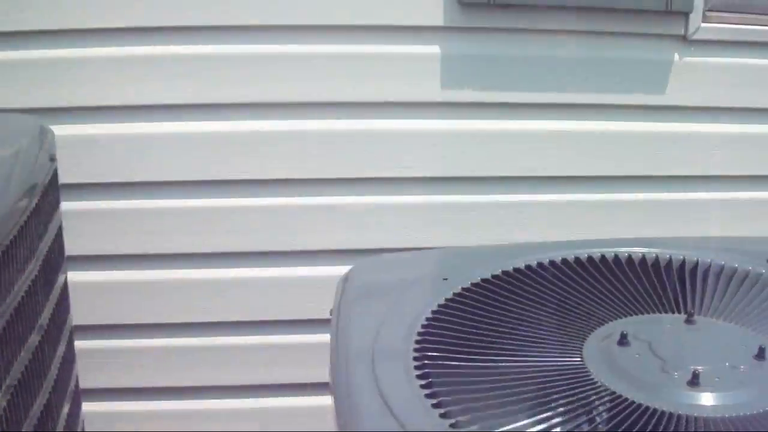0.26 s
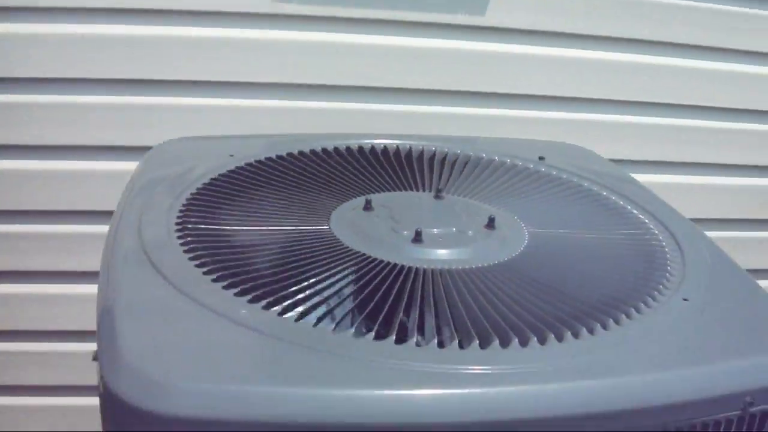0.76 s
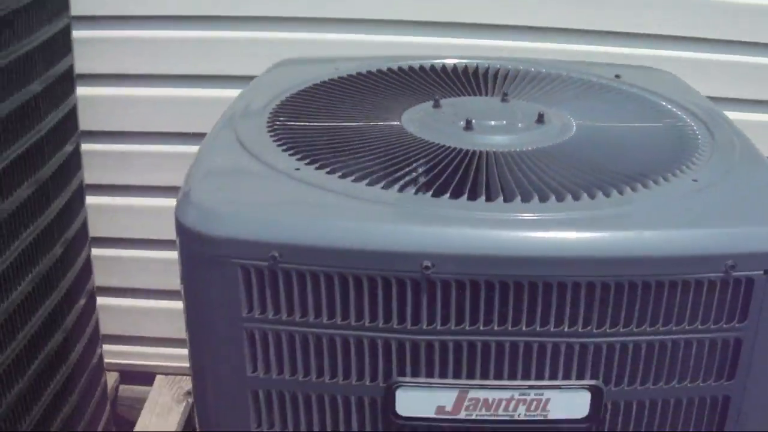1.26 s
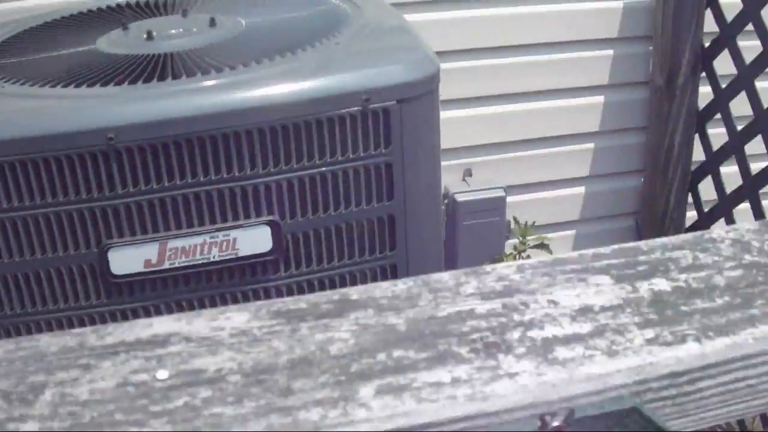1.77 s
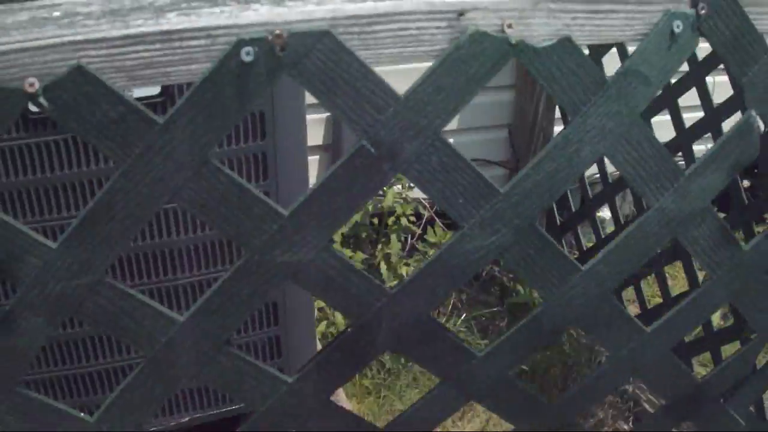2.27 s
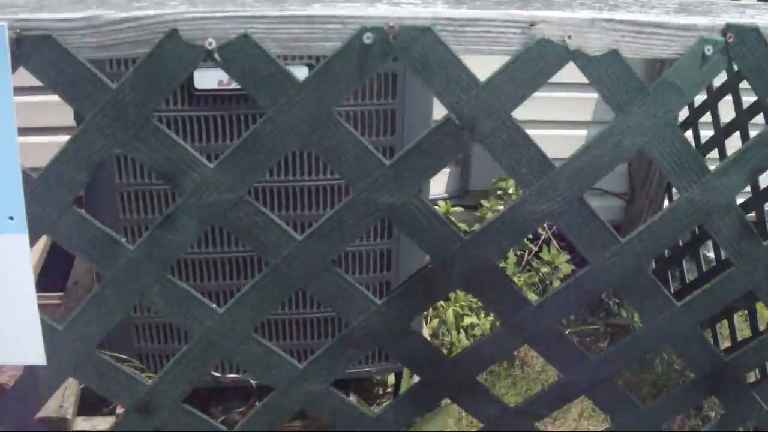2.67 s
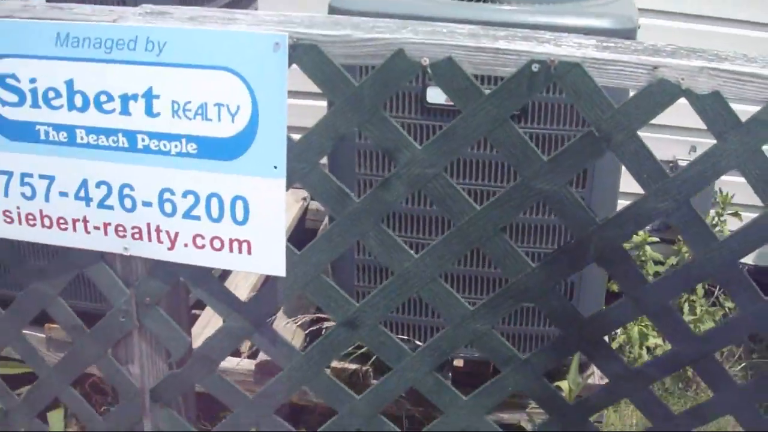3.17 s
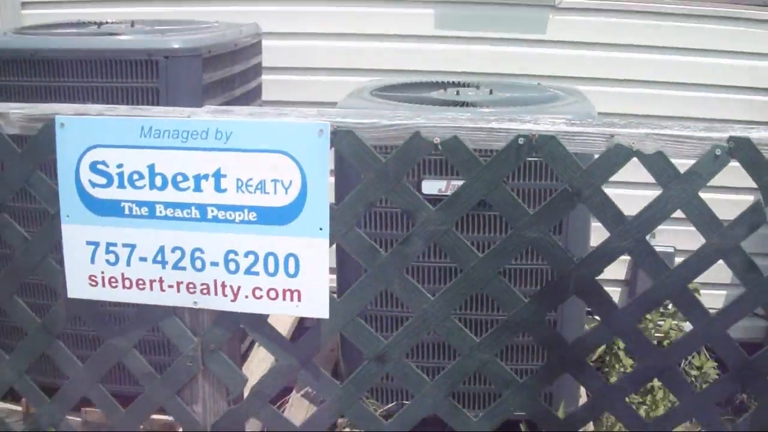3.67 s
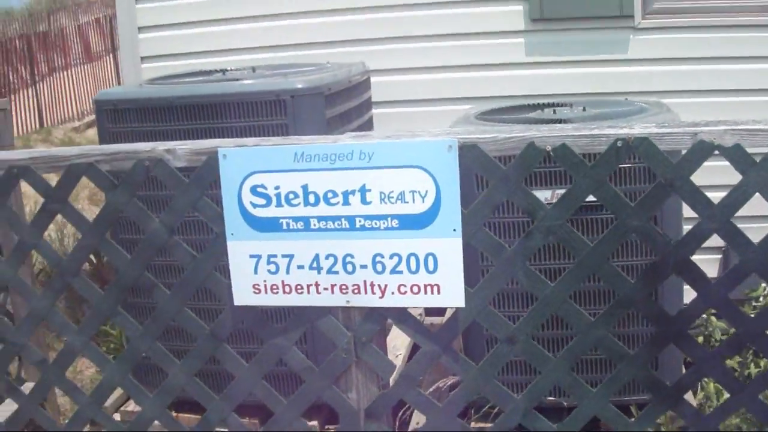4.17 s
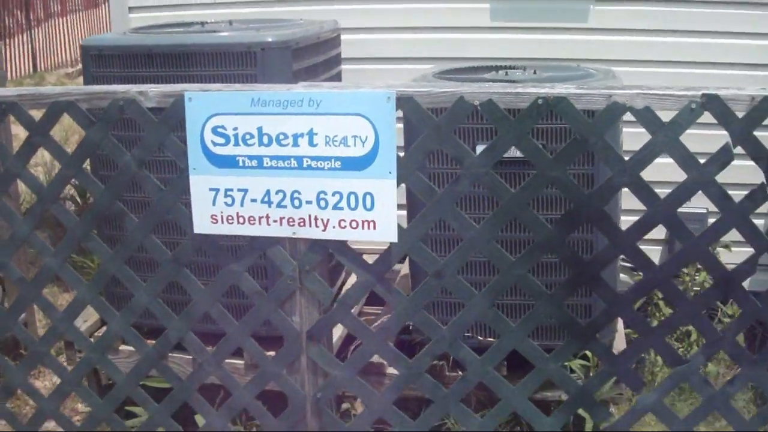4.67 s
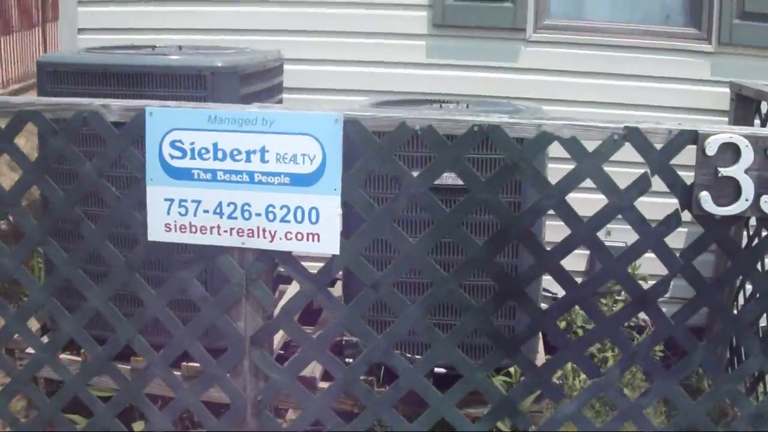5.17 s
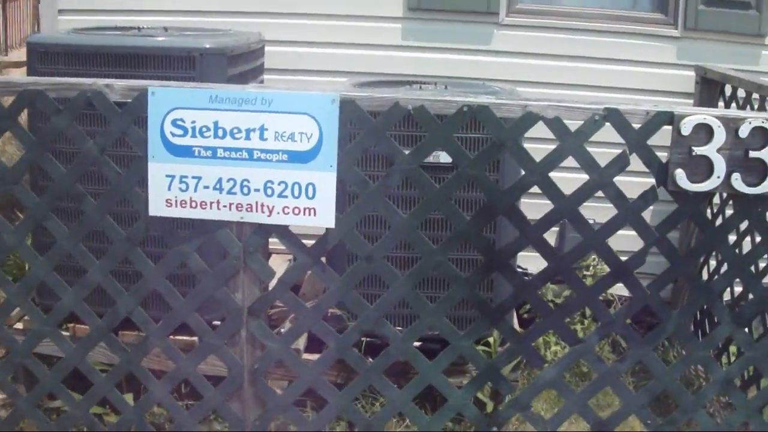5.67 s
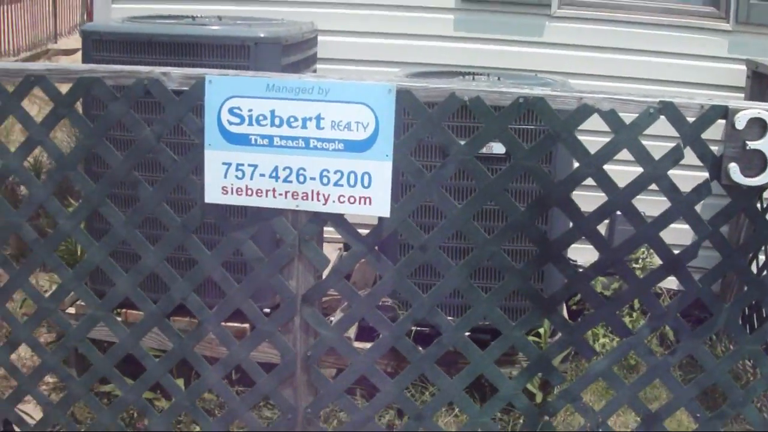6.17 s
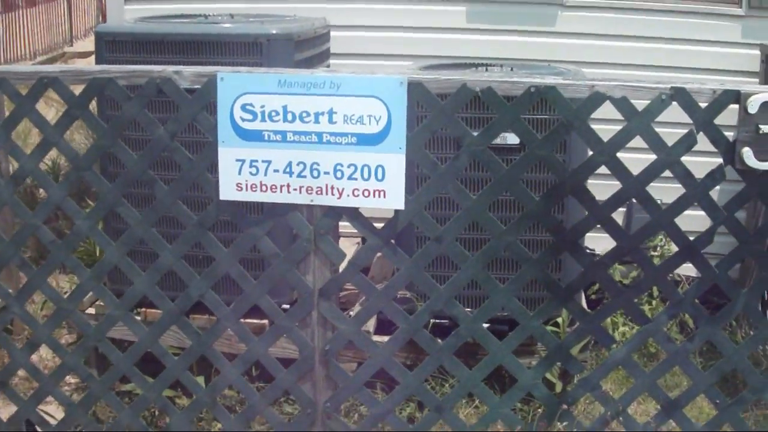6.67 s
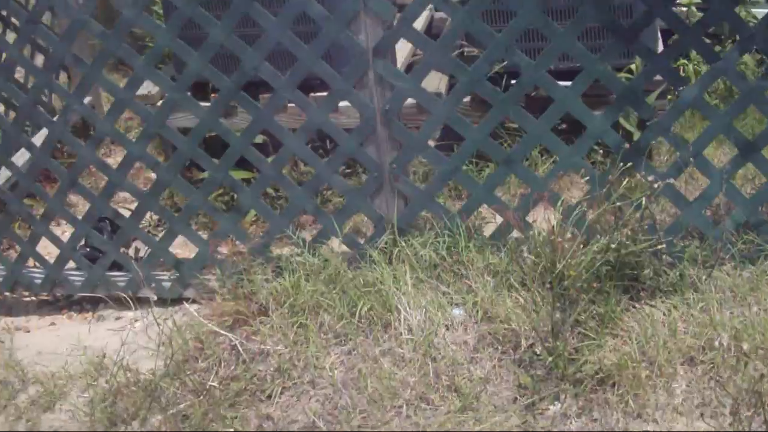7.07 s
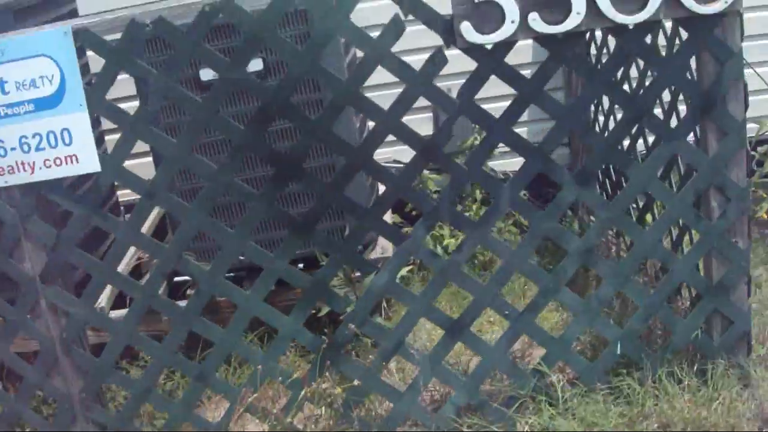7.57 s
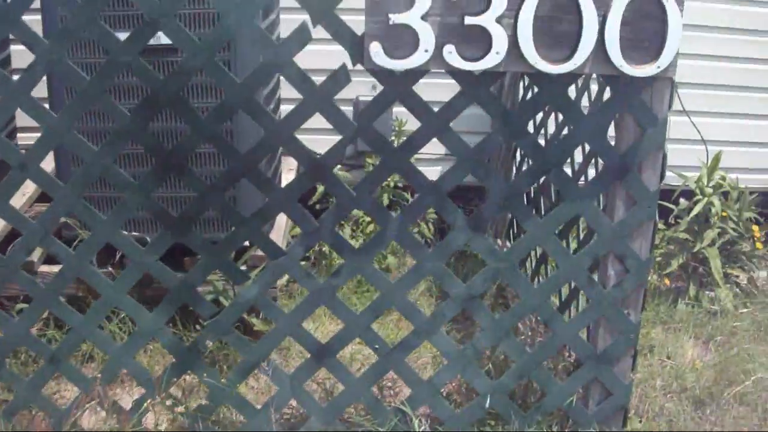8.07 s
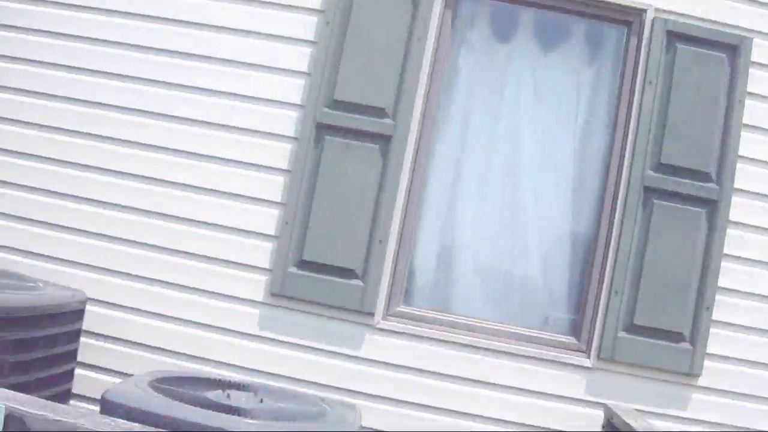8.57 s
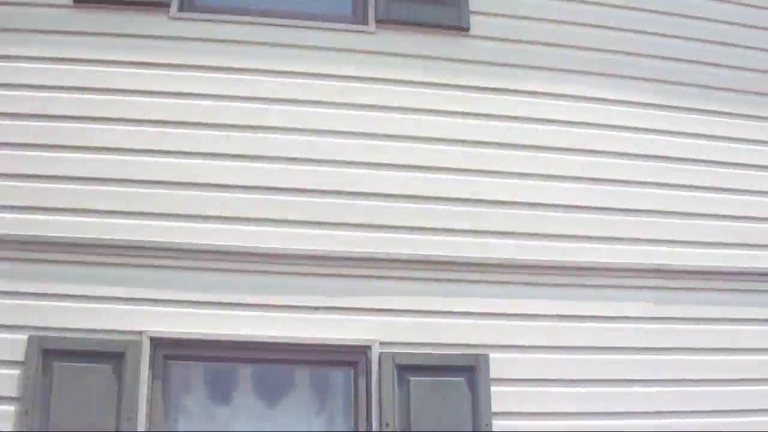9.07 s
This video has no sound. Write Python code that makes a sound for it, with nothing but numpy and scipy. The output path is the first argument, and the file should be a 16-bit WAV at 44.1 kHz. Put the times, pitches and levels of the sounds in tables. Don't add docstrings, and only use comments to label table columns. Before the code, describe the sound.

Outdoors beside a house wall, two heat pump units hum with low compressor tones and a broad fan rush. A hand-held microphone starts close and backs away, so the units soften. Midway come soft thuds, two sharp twig snaps and wind rumble; a far engine drones higher, cars wash past, and small metal ticks and faint bird chirps come late.

```python
import sys
import numpy as np
from scipy import signal
from scipy.fft import rfft, irfft, next_fast_len
from scipy.io import wavfile
from scipy.ndimage import uniform_filter1d

SR = 44100
rng = np.random.default_rng(int(sys.argv[2]) if len(sys.argv) > 2 else 0)


def makeup_ratio(level_db):
    decades = np.asarray(level_db, float) / 20
    return 10 ** decades


def file_out(sig):
    cols = np.atleast_2d(sig).T
    lim = np.clip(cols, -1, 1)
    pcm = np.round(lim * 32767).astype(np.int16)
    wavfile.write(sys.argv[1], SR, pcm)


N = 410571
T = np.arange(N) / SR


def curves(table):
    s, *columns = np.transpose(table)
    return [np.interp(T, s, c) for c in columns]


def walk(rate):
    k = int(SR / rate)
    held = np.repeat(rng.standard_normal(N // k + 1), k)
    return 1.55 * uniform_filter1d(uniform_filter1d(held, k), k)[:N]


def tone(hz, db, wobble_db=0., rate=6.):
    turns = np.cumsum(hz / SR + 0 * T) + rng.random()
    return np.sqrt(2) * makeup_ratio(db + wobble_db * walk(rate)) * np.sin(2 * np.pi * turns)


def share(spectrum, hz, lo_hz, hi_hz):
    f, db = np.transpose(spectrum)

    def density(at_hz):
        return makeup_ratio(2 * np.interp(np.log(at_hz), np.log(f), db))

    return density(hz) / np.sum(density(np.arange(lo_hz, hi_hz)))


def swells(base_db, events):
    return makeup_ratio(2 * base_db) + sum(makeup_ratio(2 * db) * np.exp(-((T - s) / half) ** 2) for s, db, half in events)


def add(x, s, sound):
    i = int(s * SR)
    x[i:i + len(sound)] += sound[:N - i]


def ring(hz, t60, rise=0.00025, sag=0.):
    t = T[:int(.3 * SR)]
    bent = t + sag * 0.00069 * (1 - np.exp(-t / 0.00067))
    return np.sin(2 * np.pi * hz * bent) * 1000. ** (-t / t60) * (1 - np.exp(-t / rise))


def distance_m():
    # start_s, distance_m
    path = [(0, 1.01), (.6, 1.14), (1.2, 1.37), (1.9, 1.92), (2.5, 2.6), (3.3, 2.9), (4.2, 3.6), (5.3, 4.4),
            (7.1, 5.2), (9.31, 5.1)]
    return curves(path)[0]


def heard_db(db_at_1m, loss, fence_db, turn_db):
    behind_fence = (1 + np.tanh((T - 2.78) / 0.18)) / 2
    facing_wall = (1 + np.tanh((T - 7.3) / 0.27)) / 2
    return db_at_1m - loss * 20 * np.log10(distance_m()) + fence_db * behind_fence + turn_db * facing_wall


def fan_db():
    return heard_db(-40.5, 0.71, fence_db=-7, turn_db=2.5)


def near_compressor():
    # order, start_level_db
    orders = [(1, -43), (5, -52), (6, -51.5), (7, -51.5), (13, -58), (14, -57), (15, -69), (17, -56),
              (18, -66), (19, -54), (20, -58.5), (21, -60.5), (22, -56.5), (23, -68), (25, -93),
              (30, -67.5), (32, -71), (36, -64.5), (39, -65), (43, -81), (78, -70)]
    shaft_hz = 58.88
    out = tone(3 * shaft_hz, heard_db(-33, 0.62, fence_db=-0.7, turn_db=-3.5), 1.46, 9.5)
    fade_db = 0.83 * (fan_db() - fan_db()[SR])
    return out + sum(tone(round(k) * shaft_hz, db + fade_db, 1.55, 2.55) for k, db in orders)


def far_compressor():
    # order, level_db
    orders = [(1, -47), (10, -65.5), (17, -81), (18, -60.5), (19, -75), (20, -81), (21, -80), (23, -69),
              (25, -71), (26, -75.5)]
    shaft_hz, far_db = 58.97, heard_db(-0.5, 0.24, fence_db=2.5, turn_db=2)
    return sum(tone(round(k) * shaft_hz, db + far_db, 2.1, 2.52) for k, db in orders)


def mains_buzz():
    # order, level_db
    orders = [(2, -53), (6, -60.5), (8, -69)]
    mains_hz = 59.95
    out = tone(4 * mains_hz, heard_db(-36, 0.64, fence_db=0.93, turn_db=3), 1.03, 5.5)
    return out + sum(tone(round(k) * mains_hz, db, 1.1, 2.57) for k, db in orders)


def fan_blades():
    blade_hz = 42.8
    blade_db = heard_db(-34.5, 1.16, fence_db=1.5, turn_db=1) + 2.0 * walk(4.5)
    return tone(blade_hz, blade_db - 2.0, 1.7) + tone(2 * blade_hz, blade_db - 11.5, 2.8)


def fan_rush():
    # pitch_hz, density_db (per Hz)
    colour = [(40, -18), (100, -5.5), (160, -9), (280, -14), (400, -18), (500, -13), (640, -14.5),
              (1000, -21), (1300, -30), (1600, -41.5), (2600, -52), (4000, -90)]
    level = makeup_ratio(2 * fan_db())
    return lambda hz: level * share(colour, hz, 375, 602)


def grille_hiss():
    # pitch_hz, density_db (per Hz)
    colour = [(760, -14), (1300, -2), (1600, -7.5), (2100, -4), (2500, -9), (3000, -10.5), (3480, -18.5),
              (3950, -10.5), (4500, -10.5), (5000, -20.5), (6800, -13.5), (7800, -20), (9000, -23),
              (11700, -49), (19800, -120)]
    level = makeup_ratio(2 * heard_db(-47, 0.98, fence_db=-0.26, turn_db=3.5))
    return lambda hz: level * share(colour, hz, 1870, 4650)


def wall_gap():
    level = makeup_ratio(2 * heard_db(-50, 0.32, fence_db=2.5, turn_db=-2)) * makeup_ratio(2.2 * walk(4.5)) / 200
    centre = np.log2((660 + 25 * distance_m()) * (1 + .03 * walk(2.5)))  # Hz, plus Hz per metre
    return lambda hz: level * np.maximum(1 - ((np.log2(hz) - centre) / 0.48) ** 2, 0) ** 2


def wind():
    # pitch_hz, density_db (per Hz)
    colour = [(15, -6.5), (30, -2.5), (50, -6), (80, -6), (130, -9), (220, -15), (400, -46), (800, -90)]
    # start_s (the peak), peak_db, half_length_s
    gusts = [(0, -50, .3), (1.8, -43, 0.35), (2.599, -40, 0.14), (3.3, -39.5, .4), (3.8, -42.5, .3),
             (4.55, -45, 0.18), (5.1, -43, .35), (5.8, -46, 0.37), (7.05, -47, .3), (8.1, -51, 0.73)]
    level = swells(-54, gusts) * makeup_ratio(4.7 * walk(11))
    return lambda hz: level * share(colour, hz, 18.3, 37.0)


def road():
    # pitch_hz, density_db (per Hz)
    colour = [(100, -62), (260, 2.5), (450, 6), (650, -65), (1050, 1.5), (1400, -17), (2500, -22),
              (4000, -45), (8000, -80)]
    # start_s (the peak), peak_db, half_length_s
    cars = [(.9, -60, 1.2), (3.0, -49.5, 0.11), (3.55, -48, 0.58), (4.7, -52.5, .2), (8.1, -51, 0.69),
            (8.75, -47.5, .25), (9.25, -50, .2)]
    level = swells(-59.5, cars)
    return lambda hz: level * share(colour, hz, 200, 1500)


def yard():
    # pitch_hz, density_db (per Hz)
    colour = [(120, -4), (200, -9), (249, -3.5), (288, -2), (497, -21.5), (743, -12), (1780, -25.5),
              (2180, -25.5), (5820, -28), (6730, -41), (7370, -23), (7930, -28), (13900, -28), (14700, -21),
              (15600, -40)]
    level = makeup_ratio(2 * (-44.5 - 3.5))
    return lambda hz: level * share(colour, min(hz, 13900), 257, 16500)


def air():
    moving = [fan_rush(), grille_hiss(), wall_gap(), wind(), road()]
    steady = yard()
    size = next_fast_len(N)
    octave = np.log2(np.arange(1, size // 2 + 2) * SR / size)
    white, out = rfft(rng.standard_normal(size)) * np.sqrt(SR / 2), np.zeros(N)
    for hz in 16 * 2 ** (np.arange(61) / 6):
        slope = np.clip(6 * (octave - np.log2(hz)), -1, 1)
        band = irfft(white * np.cos(np.pi / 2 * slope) ** 2, size)[:N]
        power = sum(source(hz) for source in moving)
        flicker = makeup_ratio(2.0 * (hz / 500) ** -.25 * walk(4.6))
        out += band * np.sqrt(power * flicker + steady(hz))
    return out


def step_bumps():
    # start_s, peak_db, pitch_hz, t60_s
    bumps = [(2.401, -20, 45, 0.097), (2.56, -16, 70, 0.076), (2.995, -13, 55, 0.087), (3.14, -19, 45, .08),
             (3.25, -19, 28, .12), (3.36, -14, 35, .09), (3.74, -20, 60.2, .08), (4.566, -13.5, 62, .09),
             (4.85, -14, 132, 0.068), (4.85, -16, 45, .07), (7.497, -15.5, 45.3, 0.1)]
    out = np.zeros(N)
    for s, db, hz, t60 in bumps:
        add(out, s, makeup_ratio(db) * (ring(hz, t60, 0.0051) + 0.34 * ring(1.58 * hz, 0.7 * t60, 0.0058)))
    return out


def dry_snap(lo_hz, hi_hz, hi_db, t60):
    wood = ring(lo_hz, t60, sag=0.93 * (1050 / lo_hz) ** 2)
    for gain, ratio, length in [(0.42, 1.9, 1), (0.35, 0.61, 1.85), (0.12, 0.406, 4)]:
        wood = wood + gain * ring(ratio * lo_hz, length * t60)
    fibre = ring(hi_hz, t60)
    for gain, ratio, length in [(0.48, 1.08, 0.65), (0.34, .61, 1.06), (0.66, 1.17, 1),
                                (.5, 0.876, 0.88), (0.12, 1.3, 1)]:
        fibre = fibre + gain * ring(ratio * hi_hz, length * t60)
    return wood + makeup_ratio(hi_db) * fibre


def twigs_and_grass():
    # start_s, peak_db, low_ring_hz, high_ring_hz, high_ring_db
    snaps = [
        (3.0166, -11.5, 1080, 2400, -11),
        (3.0157, -29, 3840, 9000, -7),
        (4.1731, -27.5, 2040, 2300, -1),
        (4.1743, -14.5, 2470, 6350, 1.5),
        (3.6, -40.5, 3000, 7000, 6),
    ]
    # start_s, peak_db, high_ring_hz, t60_s
    cracks = [(.864, -49.5, 7540, 0.022), (3.0072, -42, 7400, .014), (7.5, -56, 6600, .04),
              (7.517, -55, 6100, .025), (8.066, -53, 7500, .03), (8.87, -55, 7700, .03)]
    breaks = [(*row, .0078) for row in snaps]
    breaks += [(s, db, 4640, hz, 10.5, t60) for s, db, hz, t60 in cracks]
    out = np.zeros(N)
    for s, db, lo_hz, hi_hz, hi_db, t60 in breaks:
        rattle = 0.19 * rng.standard_normal(900) * np.exp(-T[:900] / 0.0018)
        add(out, s, makeup_ratio(db) * dry_snap(lo_hz, hi_hz, hi_db, t60))
        add(out, s, makeup_ratio(db) * uniform_filter1d(rattle, size=2))
    return out


def strap_ring():
    # start_s, peak_db
    ticks = [(4.8184, -46), (7.4864, -47), (7.4994, -40.5), (7.5163, -38), (7.5727, -44), (8.0646, -38.5),
             (8.8662, -39), (8.8774, -43), (9.0488, -34.5)]
    # pitch_hz, level_db, t60_s
    modes = [(6660, -14, 0.034), (7600, -10, 0.02), (8900, -10, .025), (9690, -4, 0.054),
             (10300, -1, 0.039), (11600, -4.5, .025), (13600, -10, .02)]
    out = np.zeros(N)
    for s, db in ticks:
        for hz, mode_db, t60 in modes:
            strike_db, detune = 2.1 * rng.standard_normal(), 1 + .012 * rng.standard_normal()
            add(out, s, makeup_ratio(db - 3.5 + mode_db + strike_db) * ring(hz * detune, t60, .0005))
    return out


def chopper_whine():
    out = tone(7170.2, -56.5) * np.tanh(16.0 * np.sin(np.pi * 54.37 * T))
    for hz, q, db in [(7100, 21, -58.0), (6400, 12, -51.0)]:
        out = out + makeup_ratio(db) * signal.lfilter(*signal.iirpeak(hz, q, SR), rng.standard_normal(N))
    return out


def sensor_whine():
    # start_s, phase_slip_turns (per frame)
    slip = [(0.0, 0.1), (0.42, 1.28), (1.6, 1.3), (1.85, 0.79), (2.22, 0.94), (2.85, -1.95), (3.05, -2.18),
            (3.5, -1.8), (4.0, -0.71), (4.4, -0.06), (4.7, 0.21), (5.85, 0.26), (7.0, -0.15), (7.4, -0.8),
            (7.62, -0.96), (8.25, -2.88), (8.43, -2.96), (9.31, 1.25)]
    # start_s, end_s
    spells = [(0, 0.28), (.95, 1.25), (2, 2.4), (2.92, 3.22), (5.9, 6.25), (7.1, 7.25), (7.65, 8.25),
              (9.05, 9.31)]
    frame = (T * 29.65).astype(int)
    turns = 14884 * T + np.cumsum(curves(slip)[0] * np.diff(frame, prepend=0))
    spell = uniform_filter1d(sum((T > a) * (T < b) * 1. for a, b in spells), size=800)
    half_pitch = makeup_ratio(-68.5 + 9 * spell) * np.sin(np.pi * turns)
    return makeup_ratio(-56.5) * np.sin(2 * np.pi * turns) + half_pitch


def engine():
    # start_s, firing_hz, level_db
    throttle = [(.8, 91.97, -43), (1.3, 93, -40), (1.92, 97.7, -39), (2.3, 103, -45.5), (2.72, 107.4, -29),
                (3.68, 114.0, -27), (4.41, 116.1, -30.5), (4.75, 117, -36), (5.55, 122.5, -28),
                (5.74, 119.2, -38), (6.43, 122.5, -28.5), (6.68, 122.0, -40.5), (7.0, 119.3, -32.5),
                (7.35, 111.7, -41), (7.66, 104.3, -43), (8.3, 103, -54), (8.75, 107.2, -47),
                (9.24, 110.5, -39.5)]
    hz, db = uniform_filter1d(curves(throttle), size=4000)
    main = tone(hz, db, 1.02, 14) + tone(hz * 2 / 3, db - 18, 3.6)
    main_fade = np.clip((T - .8) / .15, 0, 1)
    pull_fade = np.clip(np.minimum(T - 0.77, 2.7 - T) / 0.14, 0, 1)
    return main_fade * main + pull_fade * tone(1.4 * hz, -40.5, 2.5, 8.4)


def bird():
    # start_s, length_s, start_hz, end_hz, level_db
    chirps = [
        (7.705, .05, 2805, 2730, -61),
        (7.765, .045, 2150, 2080, -61),
        (7.805, .035, 2130, 2220, -59),
        (7.86, .04, 2750, 2790, -62),
        (8, .035, 2200, 2150, -61),
        (8.025, .04, 2250, 2500, -63),
    ]
    out = np.zeros(N)
    for s, length, start_hz, end_hz, db in chirps:
        n = int(length * SR)
        turns = np.cumsum(np.linspace(start_hz, end_hz, n)) / SR
        add(out, s, 2 * makeup_ratio(db) * np.hanning(n) ** .5 * np.sin(2 * np.pi * turns))
    return out


def scene():
    units = near_compressor() + far_compressor() + mains_buzz() + fan_blades()
    handling = step_bumps() + twigs_and_grass() + strap_ring()
    electronics = chopper_whine() + sensor_whine()
    return np.tile(units + air() + handling + electronics + engine() + bird(), (2, 1))


def roll_off(x):
    return signal.sosfilt(signal.butter(12, 15710, fs=SR, output="sos"), x)


def record(dry):
    cut = signal.sosfilt(signal.ellip(10, .2, 60, 15750, fs=SR, output="sos"), dry)
    left, right = np.roll(cut[0], shift=1), cut[1]
    mid = (left + right) / 2
    side = signal.sosfiltfilt(signal.butter(4, 620, "high", fs=SR, output="sos"), (left - right) / 2)
    last_band = signal.sosfiltfilt(signal.ellip(8, .1, 50, 15200, "high", fs=SR, output="sos"), mid)
    gate = np.repeat(rng.random(N // 1024 + 1) < .36, 1024)[:N] * 1.
    dropped = uniform_filter1d(gate, size=500)
    dc_offset = .0017
    return roll_off(mid - dropped * last_band + np.array([side, -side]) + dc_offset)


dry = scene()
out = record(dry)
file_out(out)
```